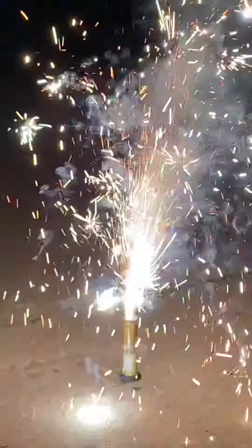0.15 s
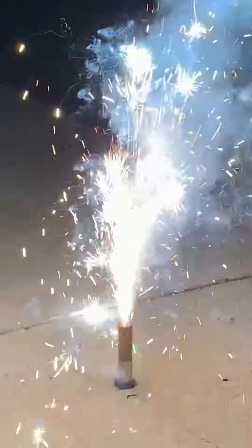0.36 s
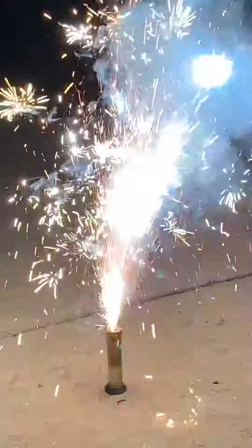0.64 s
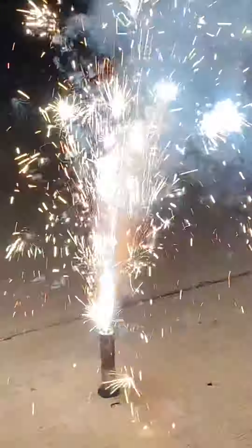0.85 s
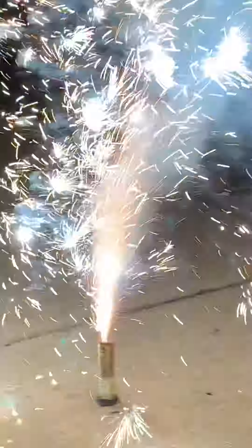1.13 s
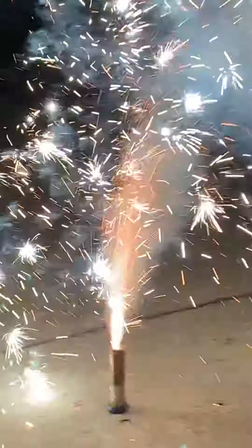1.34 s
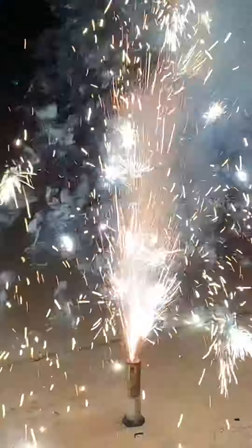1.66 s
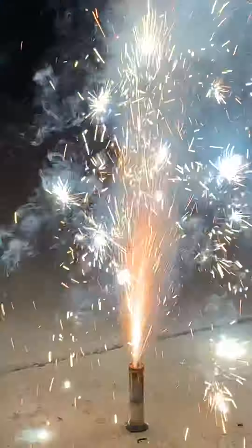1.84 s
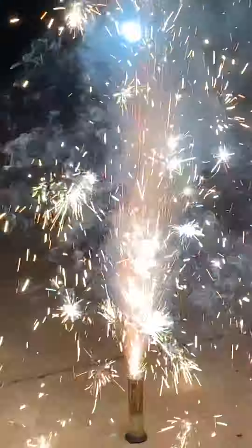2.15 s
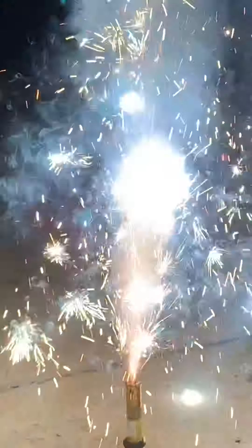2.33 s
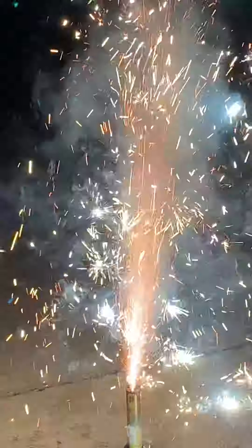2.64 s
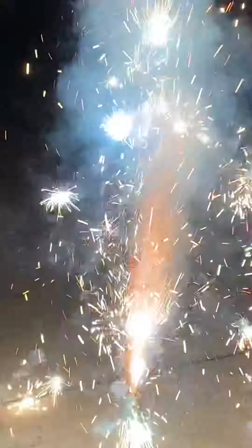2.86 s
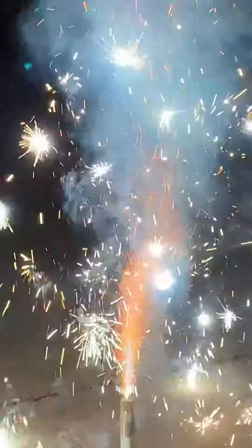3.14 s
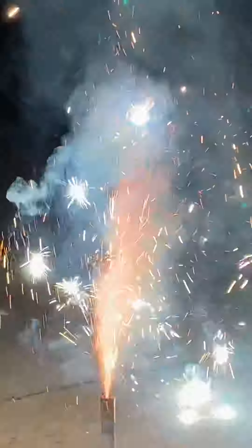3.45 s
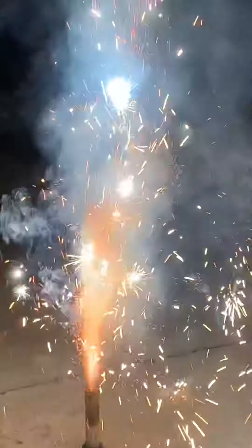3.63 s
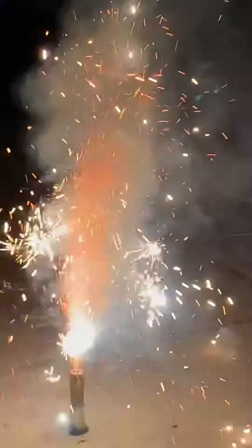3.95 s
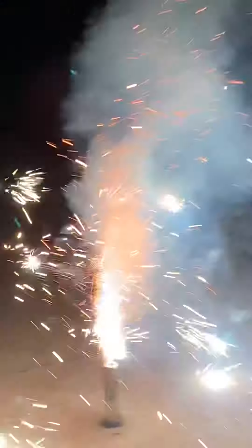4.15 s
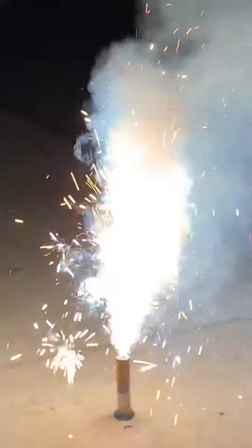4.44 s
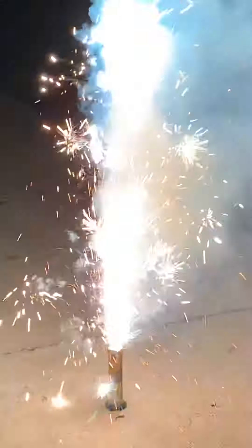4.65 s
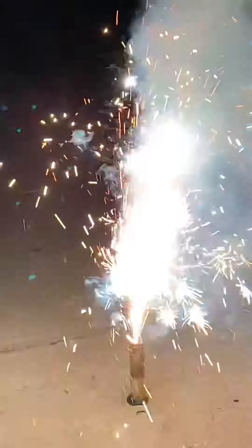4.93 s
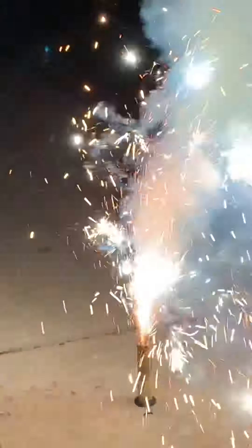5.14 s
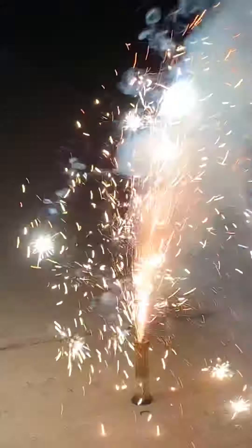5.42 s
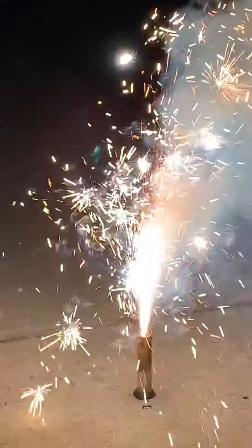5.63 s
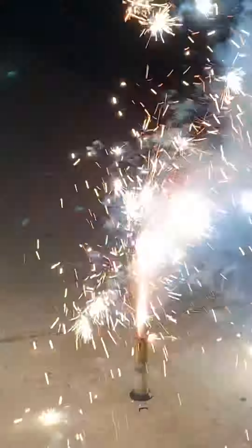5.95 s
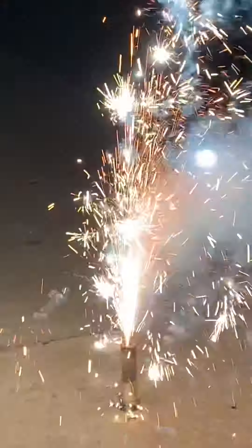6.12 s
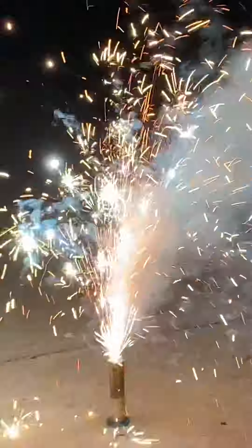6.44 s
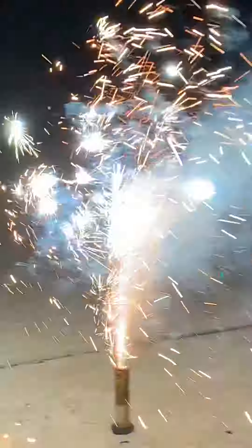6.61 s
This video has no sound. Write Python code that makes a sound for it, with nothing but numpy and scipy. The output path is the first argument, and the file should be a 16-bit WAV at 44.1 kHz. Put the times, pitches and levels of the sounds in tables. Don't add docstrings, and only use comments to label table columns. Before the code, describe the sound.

A fountain firework burns on concrete at night, heard close on a phone microphone. A steady rushing hiss carries dense fine crackle, with irregular short noisy pops as clumps flare. The sound keeps ducking and swelling as noise reduction acts, dulls and thins around three seconds with two low thumps, sputters, then grows fuller again, ending with strong bursts.

```python
import sys
import numpy as np
from scipy import signal
from scipy.fft import rfft, irfft, next_fast_len
from scipy.io import wavfile
from scipy.ndimage import uniform_filter1d

SR = 44100
rng = np.random.default_rng(int(sys.argv[2]) if len(sys.argv) > 2 else 0)


def field_ratio(decibels):
    return 10 ** (np.asarray(decibels, dtype=float) / 20)


def dump(signal):
    limited = np.clip(np.atleast_2d(signal).T, -1, 1)
    pcm = np.round(limited * 32767).astype(np.int16)
    wavfile.write(sys.argv[1], SR, pcm)


N = 298998
SIZE = next_fast_len(N + 4096, True)
HZ = np.fft.rfftfreq(SIZE, 1 / SR)

# t/s, peak level/dB
THUMP_EVENTS = [
    (3.169, -31),
    (3.247, -34),
]
# t/s, peak level/dB
FLARE_EVENTS = [(0.0474, -24), (0.1773, -21), (1.1532, -19.5), (1.3314, -15.5), (1.5387, -19), (1.924, -36),
                (2.1206, -20), (2.179, -18), (2.3511, -17), (2.4927, -14), (2.6808, -27), (2.8973, -28),
                (3.544, -25), (3.65, -25.5), (3.776, -18), (4.01, -24), (4.4788, -21), (4.6023, -20),
                (4.6528, -29), (4.7564, -22), (5.0489, -20), (5.252, -24), (5.5414, -15), (5.7916, -15),
                (6.037, -18), (6.1794, -20), (6.284, -22.5), (6.368, -34.5), (6.6942, -15)]
# t/s, level/dB
JET_STRENGTH = [(0.0, -36), (0.14, -38.5), (0.6, -38.5), (1.0, -35.5), (1.4, -38), (2.2, -36.5), (2.6, -36),
                (3.17, -38), (3.33, -42), (4.1, -44), (4.45, -43.5), (4.65, -40.5), (5.1, -39.5),
                (5.4, -38.5), (6.1, -37), (6.78, -37.5)]
# t/s, length/s, level change/dB
TUBE_SURGES = [(1.51, 0.043, 1), (1.906, 0.027, -2), (2.65, 0.18, -1), (3.066, 0.085, -0.5),
               (3.458, 0.079, 2.5), (3.564, 0.093, 7), (3.626, 0.054, -3), (3.656, 0.021, 7.5),
               (3.712, 0.11, 2), (3.814, 0.041, 6.5), (3.982, 0.027, 5), (4.017, 0.07, 4.5),
               (4.085, 0.025, -3.5), (4.264, 0.36, 2), (4.4, 0.044, 5), (4.666, 0.03, 2.5),
               (5.032, 0.037, 2), (5.423, 0.055, -2.5), (5.588, 0.075, 4), (5.606, 0.13, -4),
               (6.244, 0.12, -1), (6.491, .06, 0.5)]
# f/Hz, response slope level/dB
SOURCE_COLOUR = [(35, 5), (60, -1.5), (280, -2), (420, -12.5), (560, -10.5), (880, -13.5), (1250, -4),
                 (1800, -2), (2450, -12), (3600, -1), (4400, -3), (8000, -1.5), (10500, -2.5),
                 (15500, -7.5)]
# t/s, centre f/Hz
GROUND_HUMP = [(0.0, 580), (2.0, 550), (2.74, 560), (3.08, 714), (5.78, 644), (6.0, 570), (6.78, 570)]
# start t/s, deepest t/s, end t/s, depth level/dB
REDUCER_CLAMPS = [(-0.145, 0.072, 0.25, -13.5), (0.165, 0.38, 0.55, -11.5), (0.696, 0.92, 0.91, -7),
                  (0.566, 0.911, 1.145, -8.5), (0.983, 1.044, 1.1, -3.5), (1.13, 1.256, 1.66, -1.5),
                  (1.878, 1.985, 2.09, -5.5), (1.894, 2.27, 2.82, -10), (2.04, 2.78, 3.105, -17),
                  (2.747, 2.856, 3.02, -11.5), (2.93, 3.134, 3.285, -22), (3.373, 3.481, 3.56, -6),
                  (3.489, 3.558, 3.74, -14), (3.723, 3.745, 3.86, -9), (3.878, 3.941, 3.985, -15),
                  (3.972, 3.995, 4.067, -7), (4.563, 4.961, 5.214, -18), (4.985, 5.079, 5.24, -4.5),
                  (5.176, 5.329, 5.44, -8.5), (5.4, 5.588, 5.62, -8), (5.606, 5.652, 5.82, -8),
                  (5.744, 5.825, 5.97, -18.5), (5.855, 5.965, 6.069, -15.5), (5.897, 6.204, 6.84, -3),
                  (6.516, 6.607, 6.94, -4)]
# f/Hz, phase lag/rad, level/dB, unrelated share/1
PORT_DIFFERENCE = [(600, 0, 0, 0), (800, 0, 5.5, .17), (1050, .05, 2.5, .17), (1140, .3, 3, .8),
                   (1240, -.15, .7, .1), (2050, 1.1, 5, .28), (2300, 1.55, 2.5, .65), (2600, 1.2, .3, .7),
                   (3500, 1.35, 0, .25), (4730, 3.14, 0, .22), (5300, 4.2, 0, .2), (6900, 6.28, 0, .15),
                   (9000, 9.42, 0, .3), (11050, 12.57, 0, .13), (15150, 18.85, 0, .15)]
# f/Hz, phase lag/rad
BASS_SPREAD_LAG = [(30, -.8), (290, 3.1), (440, 5.4), (465, 3.9), (730, 9.4), (920, 12.5), (1110, 13.8),
                   (1150, 12.57)]

BASS_FOLD_S = (2.63, 2.66)
CENTRED_BASS_DB = 1
REDUCER_HZ, CUTOFF_HZ = 7980, 15720
HISS_OPEN_DB, BODY_OPEN_DB, RUMBLE_OPEN_DB = 3.5, 6.0, 5.5
HISS_SHARE, BODY_SHARE, RUMBLE_SHARE = 1.1, 0.92, 0.92
BODY_LAG_S, RUMBLE_LAG_S = 0.0024, 0.0092
RUMBLE_STEADINESS = 0.46
HUMP_NOTCH_RATIO, HUMP_NOTCH_DB = 1.78, -2


def rms_one(x):
    return x / np.sqrt(np.mean(x ** 2) + 1e-20)


def columns(rows, at):
    first, *rest = np.transpose(rows)
    return [np.interp(at, first, column) for column in rest]


def drift(rate):
    pole = np.exp(-40 * np.pi * rate / SR)
    noise = rng.standard_normal(N // 20 + 2002)
    slow = rms_one(signal.lfilter([1], [1, -2 * pole, pole * pole], noise)[2000:])
    return np.interp(np.arange(N) / 20, np.arange(len(slow)), slow)


def filtered(x, response):
    return irfft(rfft(x, SIZE) * response, SIZE)[..., :N]


def strikes(events):
    clicks = np.zeros(N)
    clicks[[round(s * SR) for s, db in events]] = field_ratio(np.array(events)[:, 1])
    return clicks


def thumps(turns, decay_s):
    t = np.arange(4000) / SR
    swing = np.sin(2 * np.pi * turns * np.sqrt(t / decay_s)) * np.exp(-t / decay_s)
    swing = swing * np.minimum(t / 0.0012, 1)
    return signal.fftconvolve(strikes(THUMP_EVENTS), swing)[:N]


def flares(decay_s):
    fall = np.exp(-1 / (decay_s * SR))
    burning = signal.lfilter([1], [1, -fall], strikes(FLARE_EVENTS))
    return burning * rng.standard_normal(N)


def sparks(per_s, spread_db):
    sizes = field_ratio(spread_db * np.minimum(rng.exponential(1, N), 4)) * rng.choice([-1, 1], N)
    chance = per_s * field_ratio(4 * drift(25)) / SR
    return rms_one(sizes * (rng.random(N) < chance))


def strength_db():
    t = np.arange(N) / SR
    swells = sum(db * np.cos(np.pi * np.clip((t - s) / length, -.5, .5)) ** 2
                 for s, length, db in TUBE_SURGES)
    return columns(JET_STRENGTH, t)[0] + swells


def jet(sputter_db, flutter_db):
    level_db = sputter_db * drift(32) + flutter_db * drift(147)
    return rms_one(rng.standard_normal(N) * field_ratio(level_db))


def clamp_db(t):
    return sum(np.interp(t, [start, deepest, end], [0, db, 0])
               for start, deepest, end, db in REDUCER_CLAMPS)


def reducer(x, patchy_db):
    hz, s, frames = signal.stft(x, SR, nperseg=512, noverlap=384)
    hiss_db = HISS_OPEN_DB + HISS_SHARE * clamp_db(s)
    body_db = BODY_OPEN_DB + BODY_SHARE * clamp_db(s - BODY_LAG_S)
    rumble_db = RUMBLE_OPEN_DB + RUMBLE_SHARE * clamp_db(s - RUMBLE_LAG_S)
    rumble_db = rumble_db + np.interp(s, BASS_FOLD_S, [0, CENTRED_BASS_DB])
    slow_db = columns(JET_STRENGTH, s)[0]
    rumble_db = rumble_db - RUMBLE_STEADINESS * (slow_db - slow_db.mean())

    hz = hz[:, None]
    low = np.interp(np.log(hz + 1), np.log([300, 1100]), [1, 0])
    high = np.interp(np.log(hz + 1), np.log([2100, 4500]), [0, 1])
    gain_db = low * rumble_db + (1 - low - high) * body_db + high * hiss_db
    gain_db -= 1.9 * (hz / REDUCER_HZ) ** 2

    hump_hz = columns(GROUND_HUMP, s)[0]
    gain_db += 7.3 * np.exp(-((hz - hump_hz) / 75) ** 2)
    gain_db += HUMP_NOTCH_DB * np.exp(-((hz - HUMP_NOTCH_RATIO * hump_hz) / 90) ** 2)

    patches = uniform_filter1d(rng.standard_normal(gain_db.shape), size=14, axis=1)
    patches = uniform_filter1d(patches, size=9, axis=0)
    gain_db = (gain_db + patchy_db * rms_one(patches)) * (hz < REDUCER_HZ)
    return signal.istft(frames * field_ratio(gain_db), SR, nperseg=512, noverlap=384)[1][..., :N]


def ports(direct, diffuse):
    lag, level_db, loose = columns(PORT_DIFFERENCE, HZ)
    loose = np.clip(loose, 0, 1)
    right = field_ratio(level_db) * np.exp(-1j * lag) * np.sqrt(1 - loose)
    own = filtered(diffuse, field_ratio(level_db) * np.sqrt(loose))
    centred_right = filtered(direct, right)

    spread = np.exp(-1j * columns(BASS_SPREAD_LAG, HZ)[0])
    spread_right = filtered(np.sqrt(.94) * direct, right * spread)
    spread_right = spread_right + filtered(diffuse, field_ratio(-7) * (HZ < 900))
    wide = np.interp(np.arange(N) / SR, BASS_FOLD_S, [1, 0])
    return np.array([direct, wide * spread_right + (1 - wide) * centred_right + own])


def scene():
    level = field_ratio(strength_db() + 10.5)
    gas = jet(sputter_db=0.44, flutter_db=1.56) + field_ratio(-6) * sparks(per_s=2500, spread_db=3.5)
    burn = level * rms_one(gas) + field_ratio(-7) * flares(decay_s=0.022)
    scattered = level * jet(sputter_db=1.5, flutter_db=2.5)
    colour_hz, colour_db = np.transpose(SOURCE_COLOUR)
    colour = field_ratio(np.interp(np.log(HZ + 1), np.log(colour_hz), colour_db) + 4.0)
    heard = reducer(filtered(np.array([burn, scattered]), colour), patchy_db=1.0)
    return ports(*heard) + thumps(turns=2.2, decay_s=0.017)


def band_limit(x):
    return signal.sosfilt(signal.butter(12, 17080, fs=SR, output="sos"), x)


def record(dry):
    mix = filtered(dry, np.interp(HZ, [32, 56, CUTOFF_HZ, CUTOFF_HZ + 40], [0, 1, 1, 0]))
    return band_limit(mix)


dry = scene()
out = record(dry)
dump(out)
```